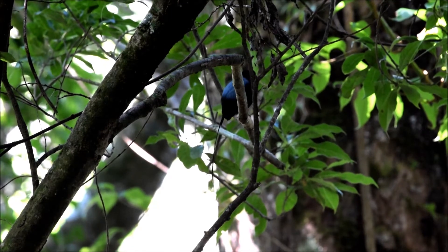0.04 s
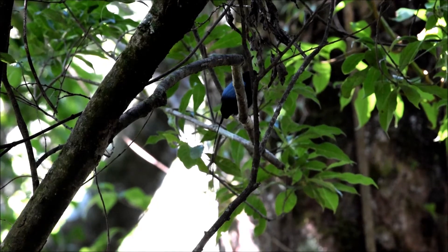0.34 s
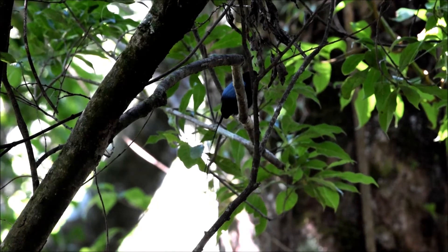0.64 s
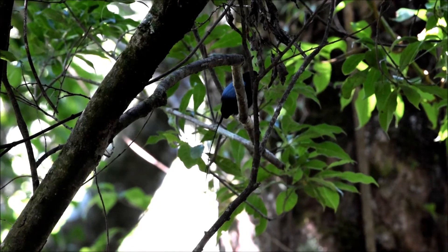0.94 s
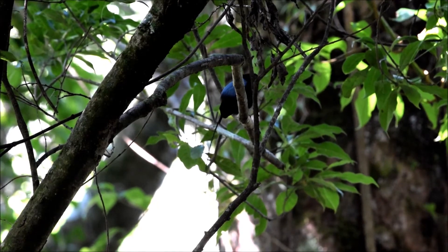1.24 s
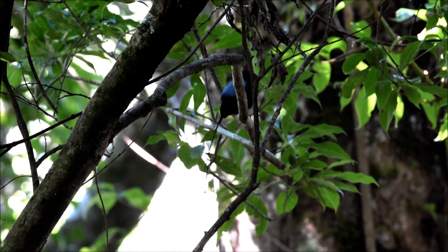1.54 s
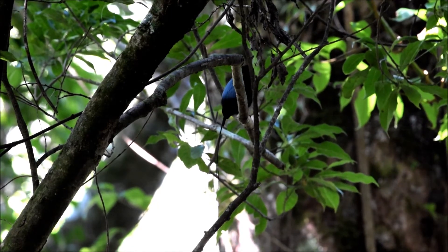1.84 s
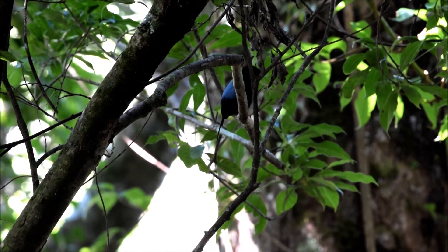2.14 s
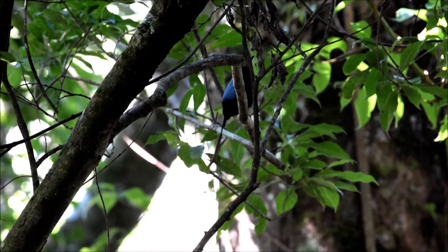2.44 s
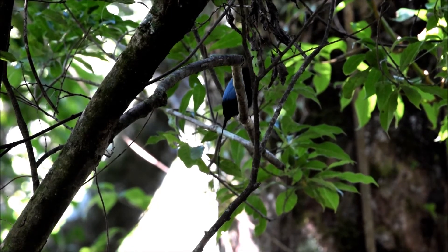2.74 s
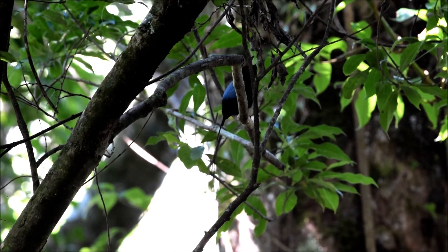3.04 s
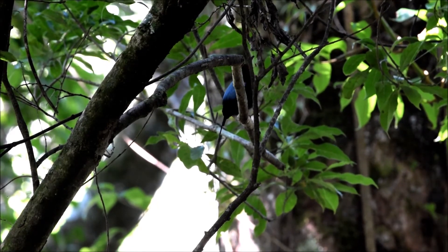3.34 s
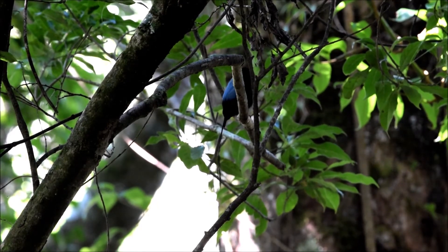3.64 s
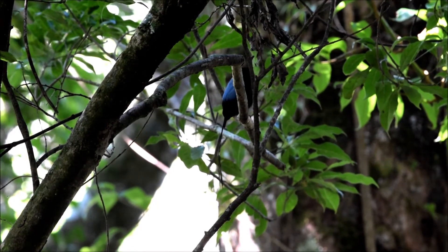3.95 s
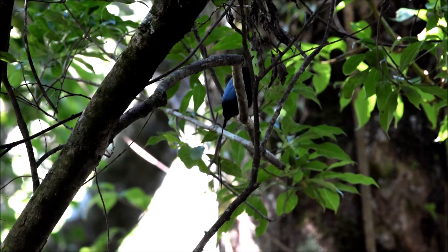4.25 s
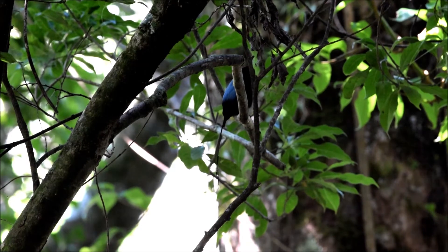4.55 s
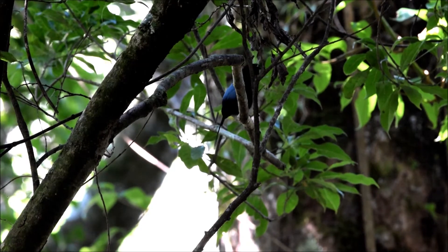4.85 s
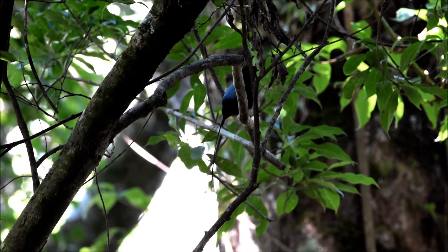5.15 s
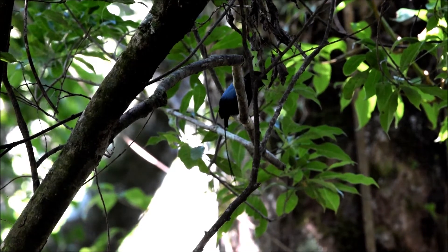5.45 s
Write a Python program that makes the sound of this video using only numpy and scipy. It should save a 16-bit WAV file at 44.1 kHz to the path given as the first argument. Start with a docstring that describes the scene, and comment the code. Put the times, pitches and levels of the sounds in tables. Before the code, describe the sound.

Forest birds give slurred whistles, quick falling notes and a warble over a soft steady hiss, ending with a loud close whistle.

```python
"""Tropical forest, one microphone, a steady wash of distant air and leaves. A rasp is already echoing
behind the foliage; a twig ticks and far birds call. One bird slurs a whistle, amid chips and more rasps.
Some way off another sings falling notes and a warble, while a dove coos and the slurred whistle returns.
Last, a loud two-part whistle comes from close by. Every note is a gliding tone, smeared into a tail by
scattering from trunks and foliage."""
import sys
import numpy as np
from scipy import signal
from scipy.fft import rfft, irfft
from scipy.io import wavfile
from scipy.ndimage import uniform_filter1d

SR = 44100
rng = np.random.default_rng(int(sys.argv[2]) if len(sys.argv) > 2 else 0)


def digitize_waveform(pressure):
    """Quantize a signal to 16-bit integers and store it at the path in sys.argv[1].

    Rows of a 2-D input are taken as channels; values are limited to [-1, 1].
    """
    field = np.atleast_2d(pressure).T
    bounded = np.clip(field, -1, 1)
    quanta = np.round(bounded * 32767).astype(np.int16)
    wavfile.write(sys.argv[1], SR, quanta)


N = 250488
TIME = np.arange(N) / SR
PROGRESS = np.linspace(0, 1, 41)   # through one note


def from_db(db):
    """Decibels to gain."""
    return 10 ** (np.asarray(db) / 20)


def rms_one(x):
    """Scale to rms 1."""
    return x / np.sqrt(np.mean(x ** 2) + 1e-20)


def waver(size=120):
    """Quick random unsteadiness of a bird's voice, smoothed over size samples; spread 1."""
    return rms_one(uniform_filter1d(uniform_filter1d(rng.standard_normal(N), size), size))


def sweep(start, length, from_hz, to_hz, db, bend=1, peak=1, swell_db=4, fade_db=4):
    """A one-way glide swelling to a peak; bend above 1 steepens its end. Rows of t/s, f/Hz, level/dB."""
    hz = from_hz + (to_hz - from_hz) * PROGRESS ** bend
    level = db - np.interp(PROGRESS, [0, np.clip(peak, .01, .99), 1], [swell_db, 0, fade_db])
    return np.transpose([start + length * PROGRESS, hz, level])


def swoop(start, length, from_hz, dip_hz, to_hz, db, bend=1.5, dip_share=.47):
    """A note that dives, eases into its dip and climbs to level off. Rows of t/s, f/Hz, level/dB."""
    dive = np.clip(1 - PROGRESS / dip_share, 0, 1) ** bend
    climb = np.sin(np.pi / 2 * np.clip((PROGRESS - dip_share) / (1 - dip_share), 0, 1))
    hz = dip_hz + (from_hz - dip_hz) * dive + (to_hz - dip_hz) * climb
    return np.transpose([start + length * PROGRESS, hz, np.full(len(hz), db)])


def voiced(note):
    """Weight a note by the bird's voice, which is strongest in mid-range."""
    # strength of the voice: f/Hz, gain/dB
    strength = [(3000, -7), (3700, -4), (4600, -1.5), (5300, -1), (6000, -6.5), (6800, -8.5)]
    times, hz, db = np.transpose(note)
    return np.transpose([times, hz, db + np.interp(hz, *np.transpose(strength))])


def glide(note, unsteady, edge_s):
    """One note: its sample indices, its running phase and one envelope for each level column."""
    times, hz, *levels = np.transpose(note)
    at = np.flatnonzero((TIME > times[0] - edge_s / 2) & (TIME < times[-1] + edge_s / 2))
    t = TIME[at]
    pitch = uniform_filter1d(np.interp(t, times, hz), 300, mode="nearest")   # muscles round the corners
    phase = 2 * np.pi * np.cumsum(pitch * (1 + unsteady[at])) / SR
    inside_s = np.minimum(t - times[0], times[-1] - t)
    gate = np.sin(np.pi / 2 * np.clip(inside_s / edge_s + .5, 0, 1)) ** 2
    return at, phase, [np.sqrt(2) * gate * from_db(np.interp(t, times, db)) for db in levels]


def whistles(notes, jitter, edge_s, flutter_db=0):
    """The syrinx sings each note as a sine, a little unsteady in pitch and, with flutter, in strength."""
    out, unsteady = np.zeros(N), jitter * waver()
    for note in notes:
        at, phase, (level,) = glide(note, unsteady, edge_s)
        out[at] += level * np.sin(phase)
    return out * from_db(flutter_db * waver(200))


def forest(x, direct_db, scatter_db, t60, build_s):
    """Direct sound plus echoes from trunks and leaves, which thicken and then die away."""
    t = TIME[:2 * SR]
    thickening = 1 - np.exp(-(t / build_s) ** 2)
    echoes = rng.standard_normal(len(t)) * thickening * from_db(-60 * t / t60)
    tail = signal.fftconvolve(x, echoes / np.sqrt(np.sum(echoes ** 2)))[:N]
    return from_db(direct_db) * x + from_db(scatter_db) * tail


def air(level_db=-59):
    """Distant air and leaves merge into a steady noise."""
    # colour of the wash: f/Hz, relative level/dB
    spectrum = [(15, -66), (25, -38.5), (204, -9), (260, -8.5), (297, -8.5), (340, -7.5), (598, -4.5),
                (648, -4.5), (1530, -6), (2230, -7.5), (2420, -7.5), (2700, -9), (3440, -13.5),
                (4750, -14.5), (15500, -35.5)]
    hz, db = np.transpose(spectrum)
    bin_hz = np.maximum(np.arange(N // 2 + 1) * SR / N, 1)
    colour = from_db(np.interp(np.log(bin_hz), np.log(hz), db))
    return from_db(level_db) * rms_one(irfft(rfft(rng.standard_normal(N)) * colour, N))


def rasps(end_hz=3336, lead_s=.1):
    """Harsh down-strokes that swell as they fall; from behind dense foliage, nearly all is scatter."""
    # strokes: t/s, length/s, starting f/Hz, level/dB
    strokes = [(-.045, .04, 5410, -46), (1.303, 0.049, 6540, -40.5), (1.628, .042, 5550, -38.5),
               (1.689, 0.052, 5210, -44.5), (4.136, 0.042, 5190, -36.5), (4.303, 0.031, 5420, -40),
               (4.453, .045, 5305, -33.5)]
    notes = [voiced(sweep(start + lead_s, length, hz, end_hz, db, bend=.9, swell_db=10))
             for start, length, hz, db in strokes]
    chatter = whistles(notes, jitter=.03, edge_s=.012, flutter_db=2)
    hidden = forest(chatter, direct_db=-18, scatter_db=0, t60=.85, build_s=.012)
    lead = int(lead_s * SR)   # the first rasp is already echoing at the start
    return np.pad(hidden[lead:], (0, lead))


def twig(start_s=.359, decay_s=.031):
    """A twig's faint, dry tick: a burst of noise that dies quickly."""
    burst = rng.standard_normal(N) * (TIME > start_s) * np.exp(-np.abs(TIME - start_s) / decay_s)
    band = signal.butter(1, [1500, 3400], "band", fs=SR, output="sos")
    return from_db(-47) * signal.sosfilt(band, burst)


def far_birds():
    """Plain notes from deep in the forest reach the microphone mostly as scattered sound."""
    # notes: t/s, length/s, from f/Hz, to f/Hz, level/dB
    notes = [(0.634, 0.086, 4130, 4130, -63.5), (.695, 0.037, 4220, 5400, -58),
             (0.725, 0.035, 4350, 4900, -55.5), (0.548, 0.24, 2480, 2135, -65),
             (0.912, .045, 5090, 5090, -56.5), (0.966, 0.1, 4020, 4080, -55.5),
             (1.103, 0.15, 4370, 4420, -57.5), (1.22, 0.11, 5400, 5800, -64), (1.27, .05, 4600, 4800, -63),
             (1.285, 0.1188, 3564, 3636, -47.5), (1.491, 0.067, 4160, 4660, -52.5),
             (1.523, 0.071, 4950, 5570, -57), (1.619, 0.028, 4330, 4520, -46.5),
             (1.95, 0.1, 3190, 2780, -64.5), (2.076, 0.046, 4000, 4600, -64.5),
             (2.262, .07, 5660, 4750, -67), (2.503, 0.036, 5870, 4920, -59),
             (2.568, 0.028, 4420, 4650, -65), (2.675, 0.066, 3570, 3484, -58.5),
             (2.901, .09, 3696, 3420, -56), (3.022, 0.095, 3360, 3270, -58), (3.12, .18, 1577, 1553, -65.5),
             (3.196, .08, 3300, 3780, -54.5), (3.31, 0.095, 3816, 4120, -53),
             (3.705, .025, 5330, 4900, -43), (3.694, .04, 5970, 5860, -58), (3.832, 0.027, 6420, 6130, -55),
             (4.07, 0.27, 2330, 2180, -63.5), (4.392, 0.026, 4300, 4410, -44.5),
             (4.92, .16, 2740, 3004, -67)]
    chorus = whistles([sweep(*row) for row in notes], jitter=.009, edge_s=.012)
    return forest(chorus, direct_db=-4, scatter_db=-.5, t60=1, build_s=.005)


def thin_birds():
    """Very high, thin whistles, far off."""
    # notes: t/s, length/s, from f/Hz, to f/Hz, level/dB
    notes = [(.56, 0.067, 7600, 7550, -72), (1.11, 0.097, 7560, 7430, -74), (1.26, 0.15, 12550, 11900, -79),
             (1.42, .08, 11800, 8500, -70), (2.39, .06, 7400, 7500, -75), (2.75, .04, 9650, 10600, -70),
             (2.79, 0.11, 10700, 10800, -74)]
    voices = whistles([sweep(*row) for row in notes], jitter=.0072, edge_s=.02, flutter_db=-1.5)
    return forest(voices, direct_db=-5, scatter_db=-3.5, t60=.71, build_s=.013)


def slurring_bird(jitter=.0042, flutter_db=-.5):
    """A slurred whistle: the octave leads while the pitch sags, the fundamental in the final drop."""
    # sag, recovery and drop: t/s into the call, f/Hz, fundamental level/dB, octave level/dB
    contour = [(0, 1662, -65, -56), (.04, 1662, -61, -51.5), (.11, 1514, -59, -46),
               (0.206, 1471, -59.5, -50.5), (.283, 1492, -58.5, -46.5), (.35, 1652, -59, -52),
               (.395, 1632, -47, -59), (.43, 1510, -46, -47.5), (.455, 1436, -57, -69)]
    # the two calls: t/s, pitch factor, gain/dB
    calls = [(.93, 1.006, 0.5), (3.992, .988, -.5)]
    low, high, unsteady = np.zeros(N), np.zeros(N), jitter * waver()
    for start, factor, gain_db in calls:
        call = [(start + t, factor * hz, low_db + gain_db, high_db + gain_db)
                for t, hz, low_db, high_db in contour]
        at, phase, (fundamental, octave) = glide(call, unsteady, edge_s=.02)
        low[at] += fundamental * np.sin(phase)
        high[at] += octave * np.sin(2 * phase) * from_db(flutter_db * waver(200)[at])
    # leaves scatter the longer waves less
    low = forest(low, direct_db=0, scatter_db=-7.5, t60=.8, build_s=.015)
    return low + forest(high, direct_db=-4, scatter_db=-1.7, t60=.9, build_s=.016)


def chips():
    """Falling sweeps so fast that they sound like ticks."""
    # chips: t/s, length/s, from f/Hz, to f/Hz, level/dB
    notes = [(1.186, 0.0036, 4900, 2920, -50), (2.531, 0.006, 4340, 1700, -60),
             (2.59, 0.0065, 4200, 1600, -59)]
    out = np.zeros(N)
    for start, length, from_hz, to_hz, db in notes:
        progress = np.clip((TIME - start) / length, 0, 1)
        phase = 2 * np.pi * np.cumsum(from_hz + (to_hz - from_hz) * progress) / SR
        out += from_db(db) * np.sin(np.pi * progress) * np.sin(phase)
    return forest(out, direct_db=8.5, scatter_db=1, t60=.23, build_s=.013)


def songster(flick_end_hz=4100, flick_hz_per_s=65000):
    """Falls, flicks and a closing warble from some way off, each leaving a bright haze."""
    # opening falls, loudest near the middle: t/s, length/s, from f/Hz, to f/Hz, level/dB
    falls = [(2.692, .125, 6520, 4330, -51.5), (2.935, 0.11, 6220, 3475, -47.5),
             (3.168, .12, 6250, 3460, -44.5), (3.409, 0.1, 6340, 3485, -43)]
    # quick downward flicks after the falls: t/s, starting f/Hz, level/dB
    flicks = [(2.862, 4900, -54.5), (3.066, 4985, -45.5), (3.314, 5030, -48), (3.543, 5200, -43),
              (3.652, 6170, -41)]
    # swoops of the warble: t/s, length/s, from f/Hz, dip f/Hz, to f/Hz, level/dB
    warble = [(3.724, 0.048, 5350, 3085, 3615, -47.5), (3.863, 0.075, 6730, 4980, 5800, -45.5),
              (3.949, 0.058, 5690, 3800, 4860, -46.5), (4.097, 0.073, 6750, 4930, 5700, -44.5),
              (4.178, 0.056, 5600, 3450, 4430, -43.5), (4.311, .097, 5700, 3160, 4400, -46),
              (4.455, 0.094, 6700, 5120, 5650, -46), (4.628, 0.1, 5520, 3086, 4500, -49)]
    notes = [sweep(*row, bend=1.6, peak=.59, swell_db=8.5, fade_db=2) for row in falls]
    notes += [sweep(start, (hz - flick_end_hz) / flick_hz_per_s, hz, flick_end_hz, db)
              for start, hz, db in flicks]
    notes += [swoop(*row) for row in warble]
    song = whistles([voiced(note) for note in notes], jitter=.012, edge_s=.008, flutter_db=3)
    return forest(song, direct_db=-3, scatter_db=-1, t60=.9, build_s=.009)


def dove():
    """One soft, low coo in the distance."""
    # its rise and fall: t/s, f/Hz, level/dB
    contour = [(3.07, 689.4, -62), (3.2, 712, -58), (3.38, 676, -60)]
    coo = whistles([contour], jitter=.0039, edge_s=.06)
    return forest(coo, direct_db=-5.5, scatter_db=-6, t60=.81, build_s=.017)


def trunk_bounce(x, delay_s=.03, db=-13):
    """Add one reflection off a trunk; gliding tones beat against it."""
    echo = from_db(db) * np.interp(TIME - delay_s, TIME, x, left=0)
    return (x + echo) / np.hypot(1, from_db(db))


def near_bird(jitter=.00053, shimmer_db=3):
    """A clean, loud whistle near the microphone, echoing late; its faint overtones scatter sooner."""
    # the call, one list a note: t/s, f/Hz, level/dB
    call = [
        [(5.411, 2620, -38), (5.418, 2645, -30), (5.442, 2700, -27), (5.468, 2725, -45), (5.484, 2720, -42),
         (5.498, 2685, -23), (5.52, 2555, -25.5), (5.54, 2410, -24), (5.559, 2270, -25), (5.574, 2110, -46)],
        [(5.57, 2770, -44), (5.61, 2675, -29), (5.64, 2590, -33), (5.68, 2540, -42)],
    ]
    # resonances of throat and beak that shape the overtones: f/Hz, level/dB
    resonances = [(4300, -78), (5300, -61.5), (6800, -93), (8000, -65), (8700, -85), (9600, -61),
                  (10800, -68), (11800, -90), (13400, -78)]
    # brightness of each note, the second brighter: tilt/dB per overtone
    tilts = [-1.5, 3.5]
    tone, sheen, unsteady = np.zeros(N), np.zeros(N), jitter * waver()
    for note, tilt_db in zip(call, tilts):
        points = [(*point, 0) for point in note]   # a 0 dB column yields the overtones' gate
        at, phase, (fundamental, gate) = glide(points, unsteady, edge_s=.0073)
        tone[at] += fundamental * np.sin(phase)
        pitch = np.gradient(phase) * SR / (2 * np.pi)
        for k in range(2, 6):
            db = np.interp(k * pitch, *np.transpose(resonances)) + tilt_db * (k - 4)
            sheen[at] += gate * from_db(db + shimmer_db * waver(300)[at]) * np.sin(k * phase)
    tone = forest(trunk_bounce(tone), direct_db=-2.5, scatter_db=-7, t60=.9, build_s=.06)
    return tone + forest(sheen, direct_db=-2, scatter_db=-1.5, t60=.45, build_s=.014)


def scene():
    """The forest at one microphone, the same in both channels."""
    mono = (air() + rasps() + twig() + far_birds() + thin_birds() + slurring_bird()
            + chips() + songster() + dove() + near_bird())
    return np.stack([mono, mono])


def record(dry, cutoff_hz=15700):
    """The top is cut steeply."""
    return signal.sosfilt(signal.ellip(12, .1, 80, cutoff_hz, fs=SR, output="sos"), dry)


dry = scene()
out = record(dry)
digitize_waveform(out)
```